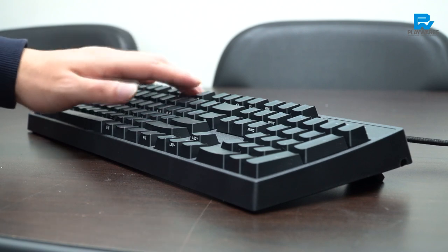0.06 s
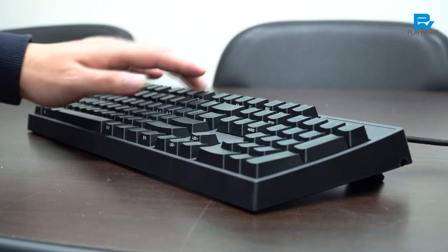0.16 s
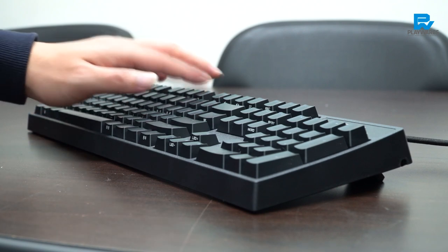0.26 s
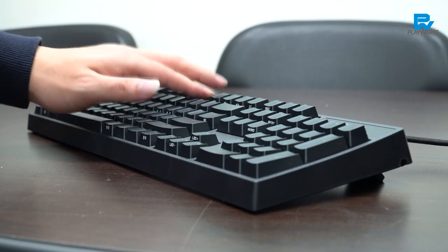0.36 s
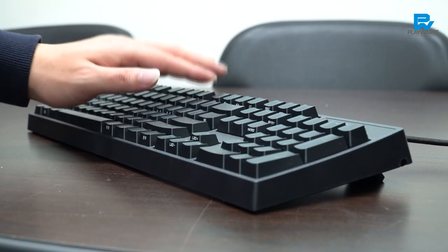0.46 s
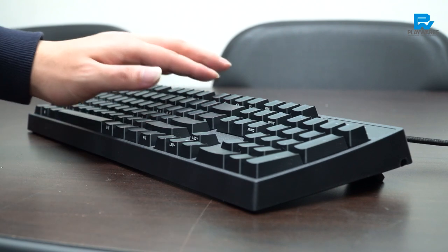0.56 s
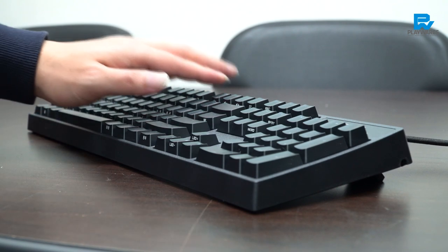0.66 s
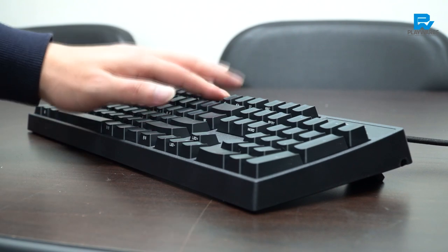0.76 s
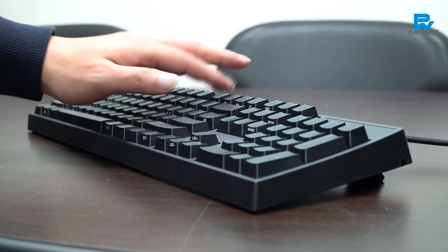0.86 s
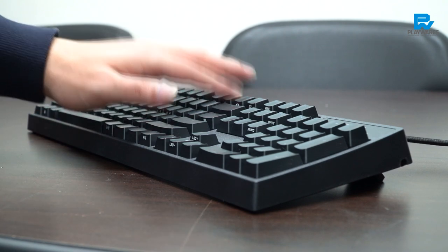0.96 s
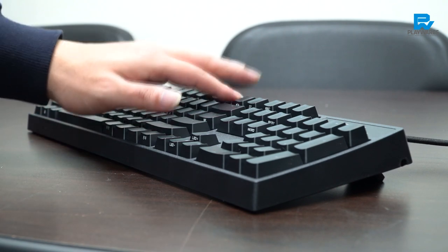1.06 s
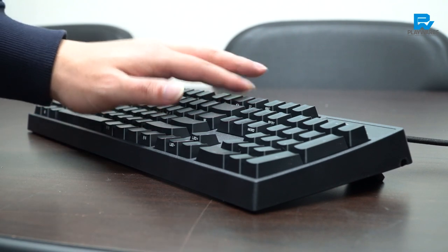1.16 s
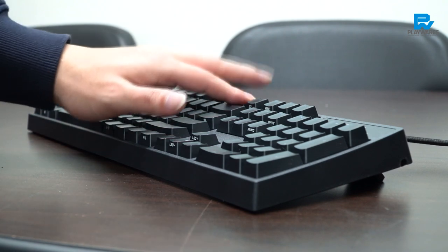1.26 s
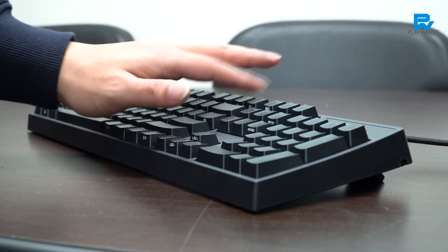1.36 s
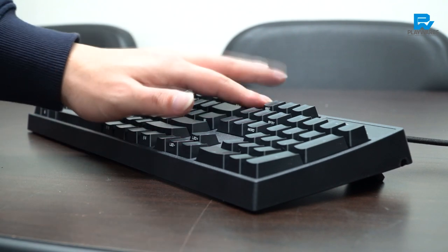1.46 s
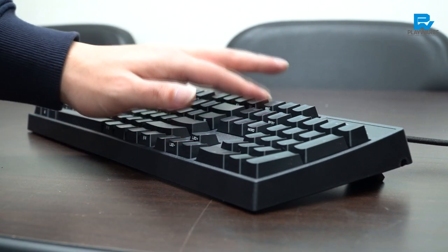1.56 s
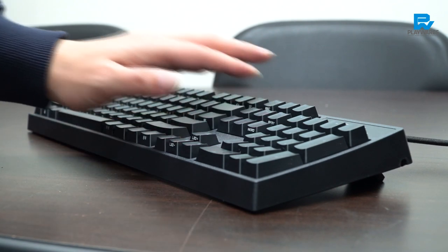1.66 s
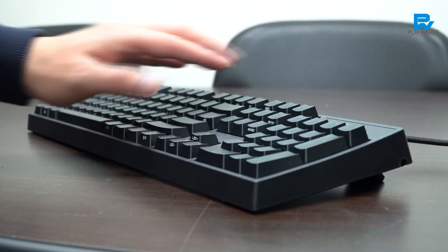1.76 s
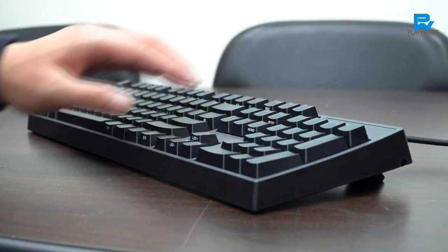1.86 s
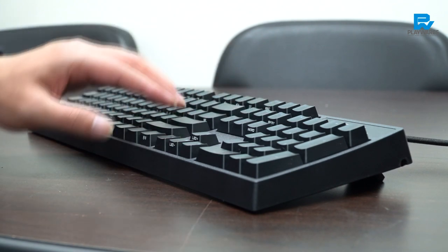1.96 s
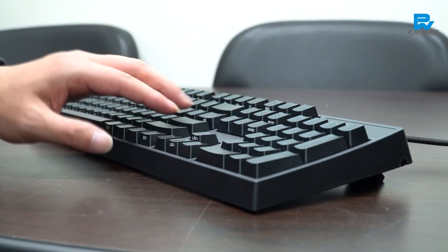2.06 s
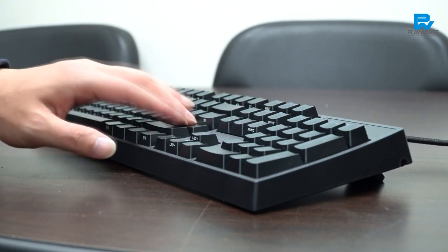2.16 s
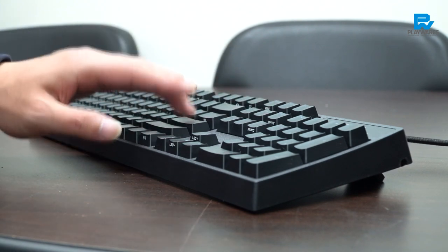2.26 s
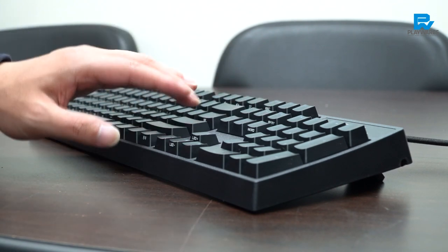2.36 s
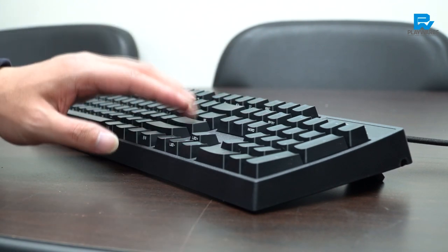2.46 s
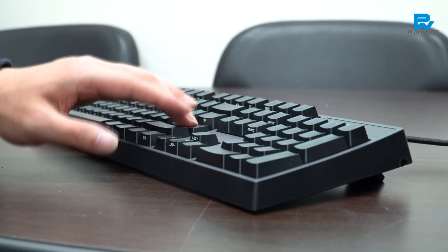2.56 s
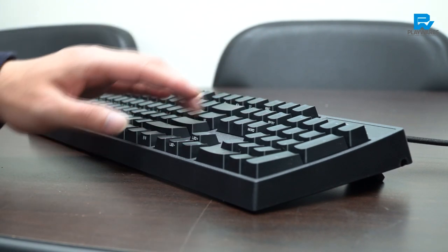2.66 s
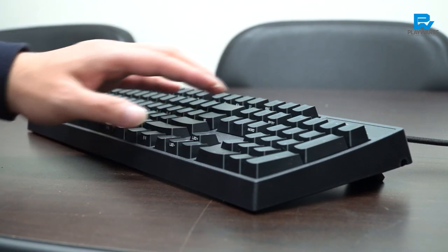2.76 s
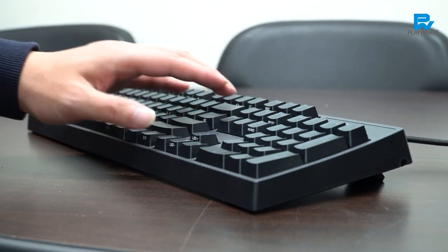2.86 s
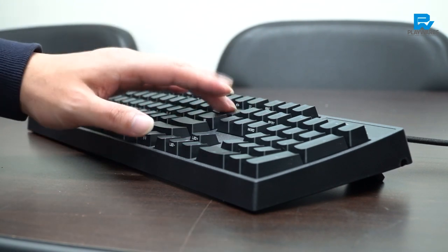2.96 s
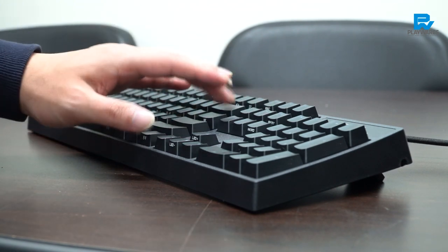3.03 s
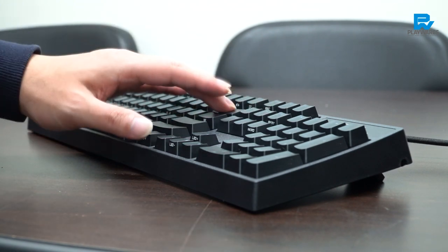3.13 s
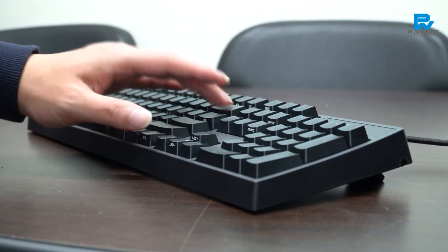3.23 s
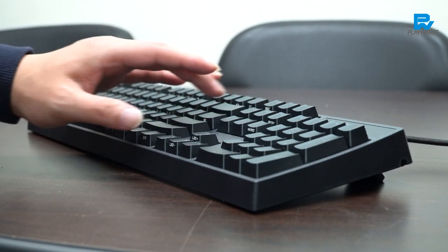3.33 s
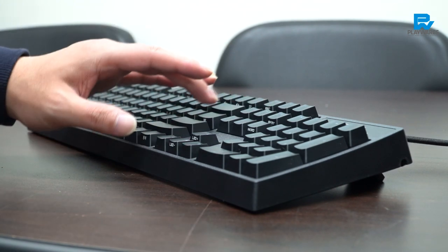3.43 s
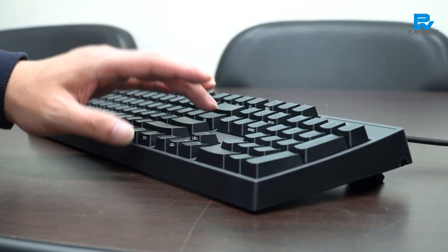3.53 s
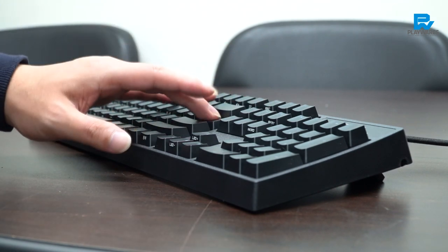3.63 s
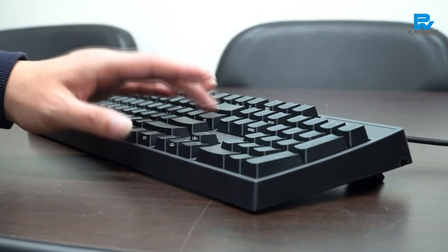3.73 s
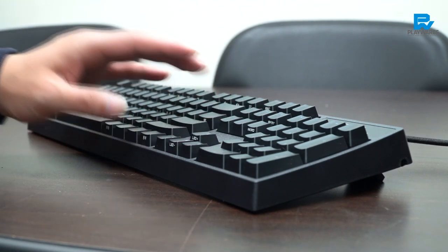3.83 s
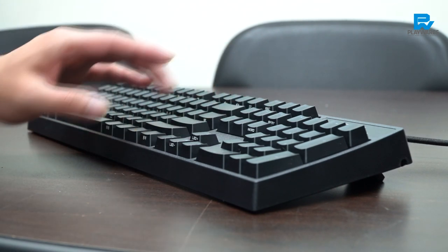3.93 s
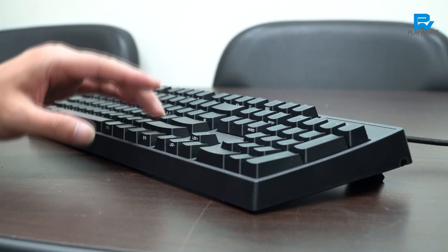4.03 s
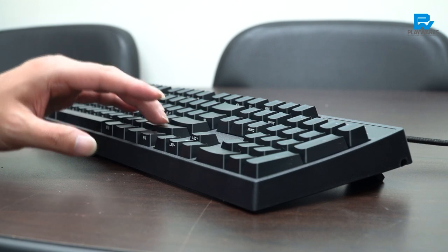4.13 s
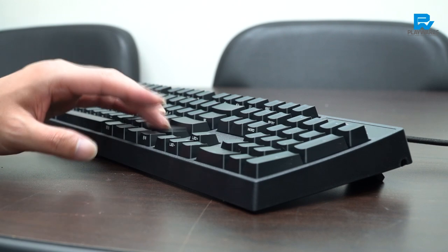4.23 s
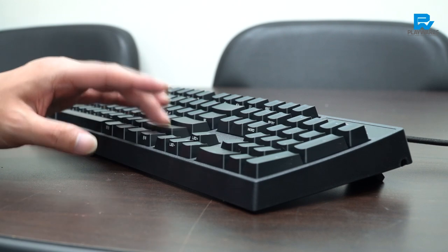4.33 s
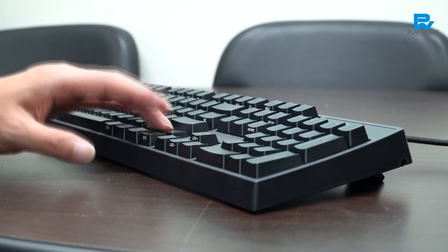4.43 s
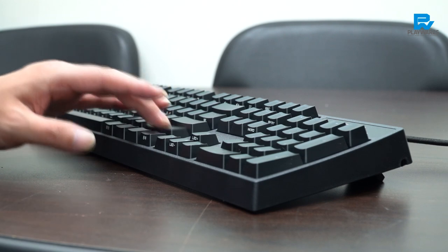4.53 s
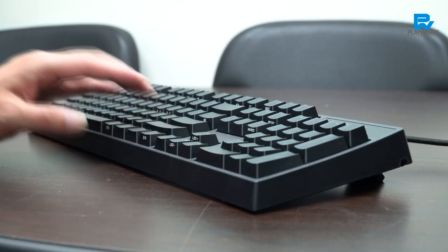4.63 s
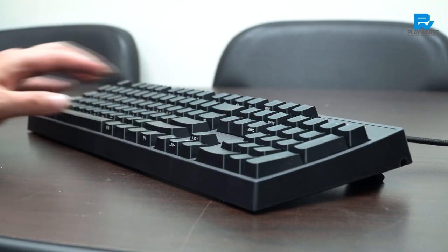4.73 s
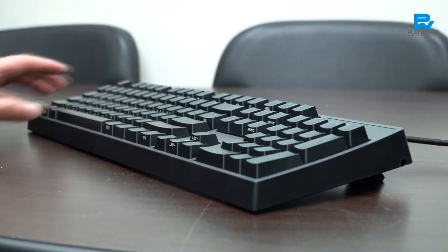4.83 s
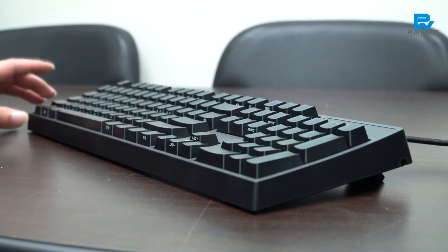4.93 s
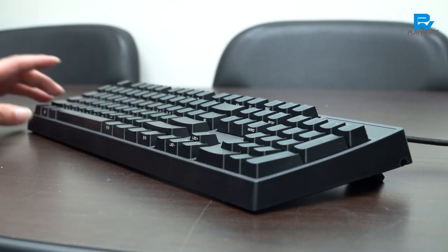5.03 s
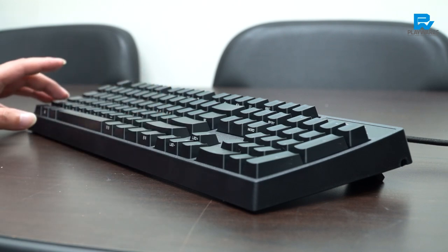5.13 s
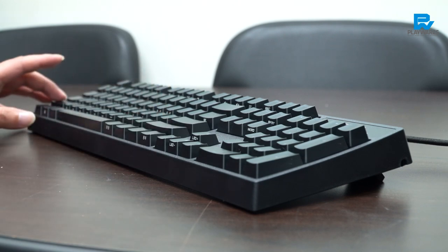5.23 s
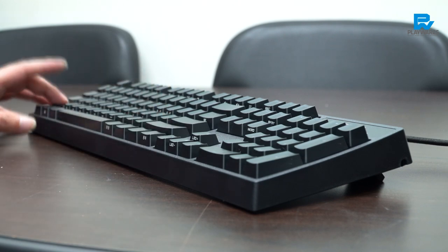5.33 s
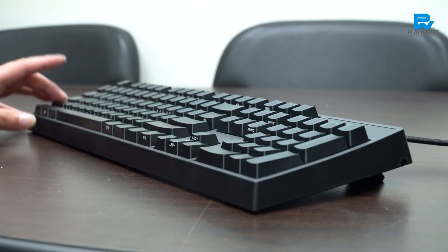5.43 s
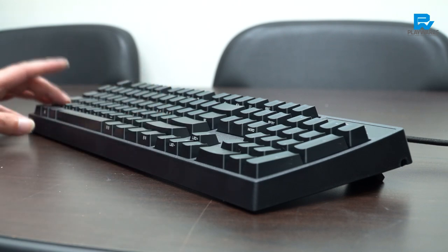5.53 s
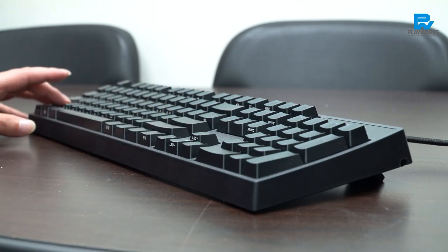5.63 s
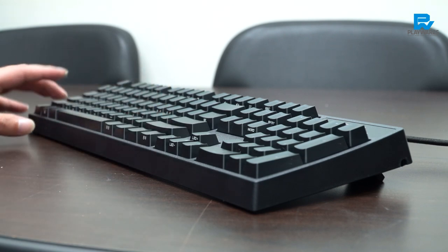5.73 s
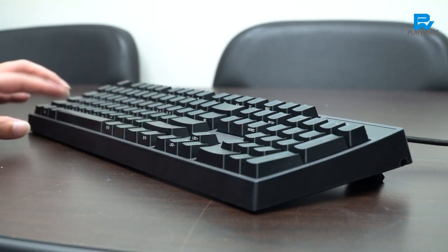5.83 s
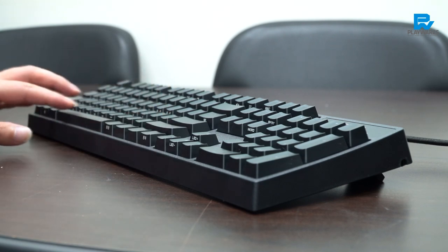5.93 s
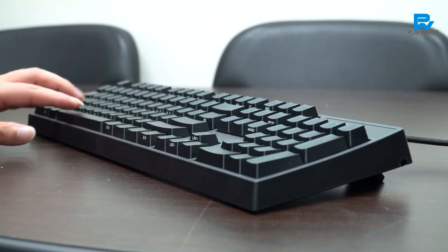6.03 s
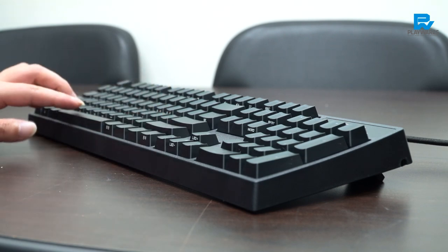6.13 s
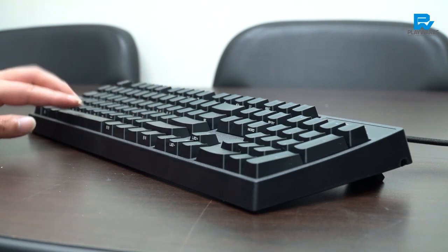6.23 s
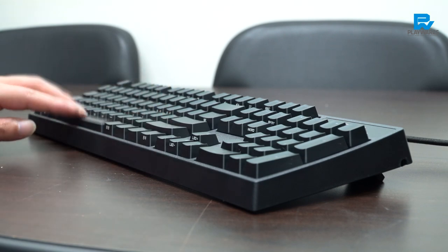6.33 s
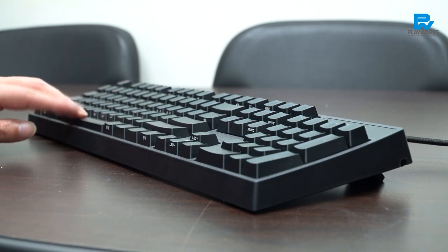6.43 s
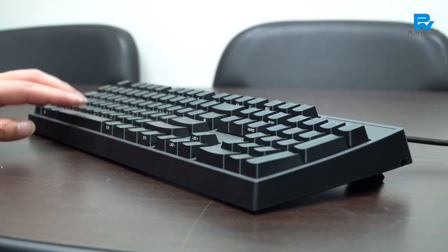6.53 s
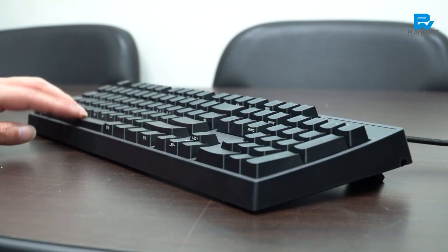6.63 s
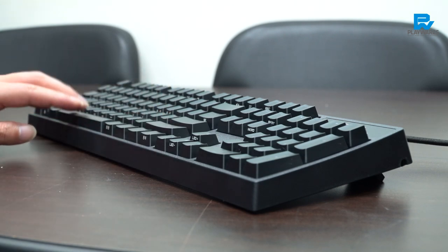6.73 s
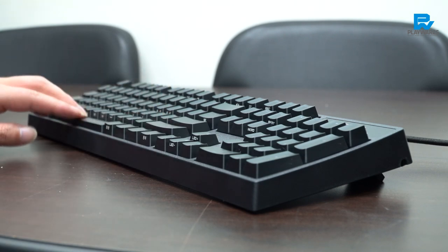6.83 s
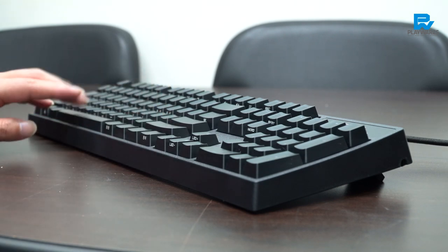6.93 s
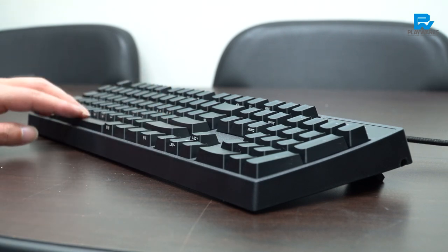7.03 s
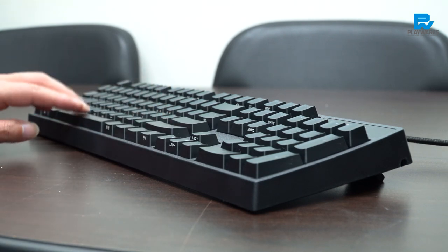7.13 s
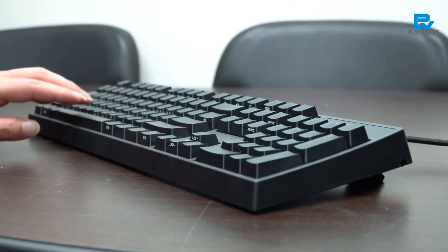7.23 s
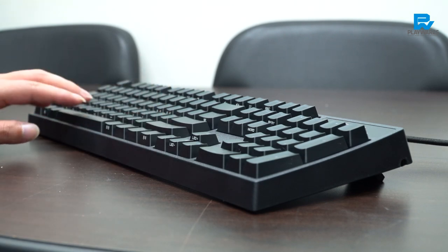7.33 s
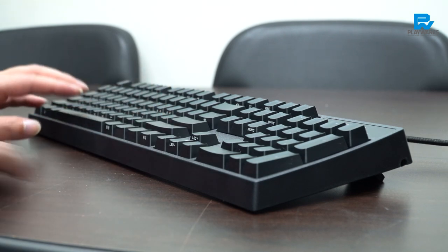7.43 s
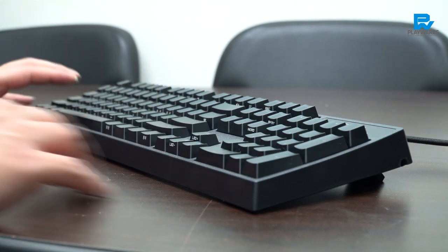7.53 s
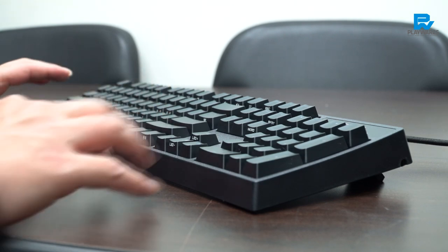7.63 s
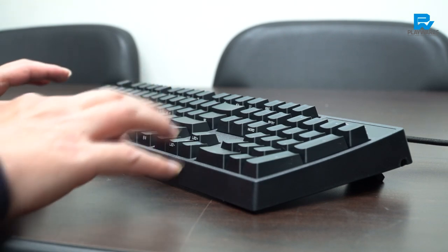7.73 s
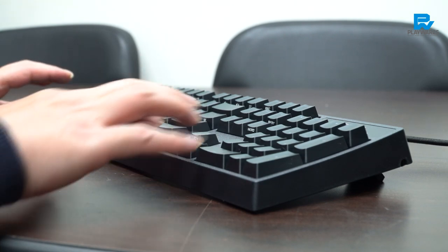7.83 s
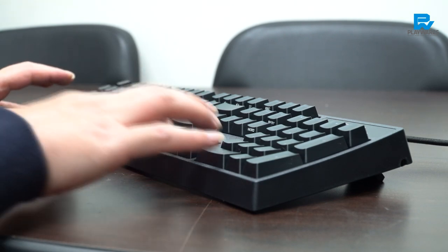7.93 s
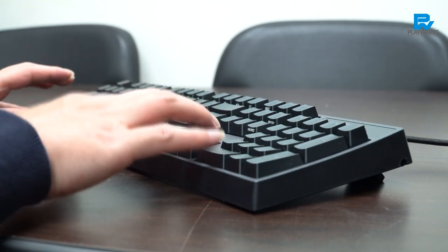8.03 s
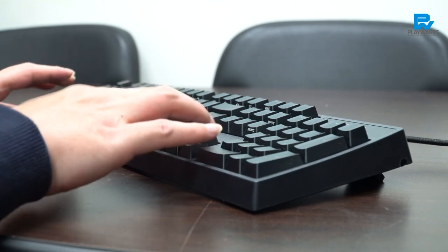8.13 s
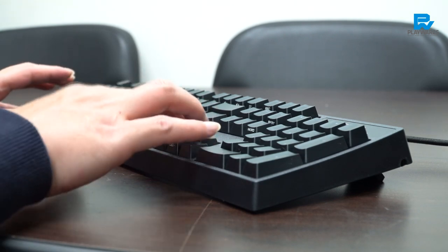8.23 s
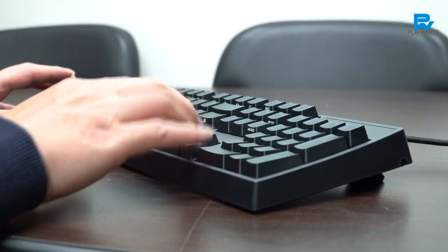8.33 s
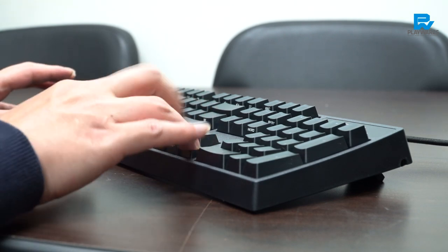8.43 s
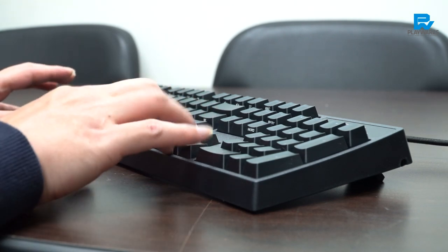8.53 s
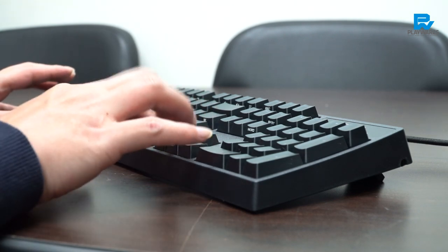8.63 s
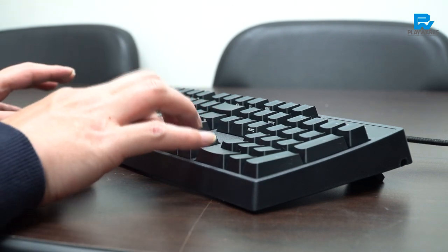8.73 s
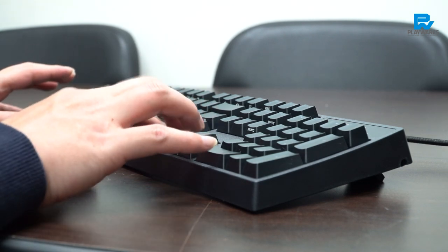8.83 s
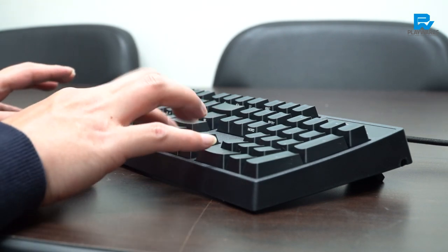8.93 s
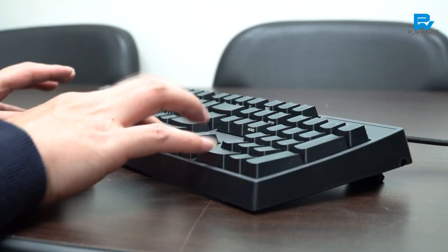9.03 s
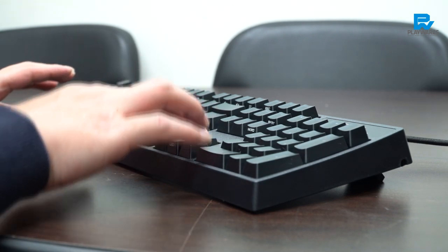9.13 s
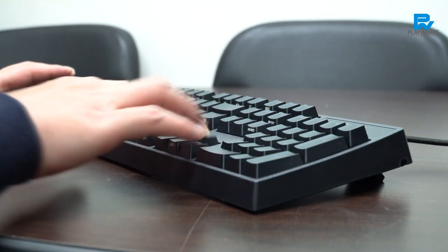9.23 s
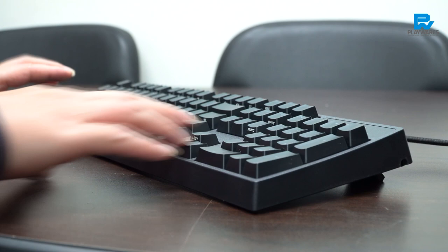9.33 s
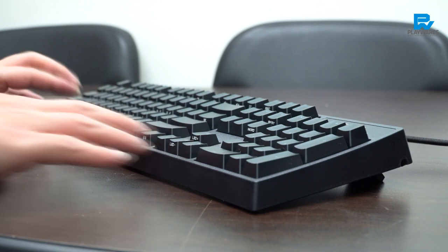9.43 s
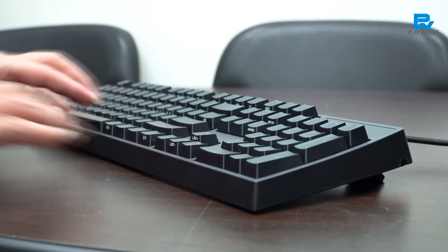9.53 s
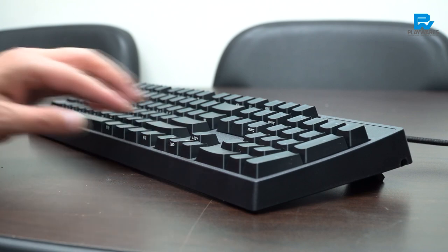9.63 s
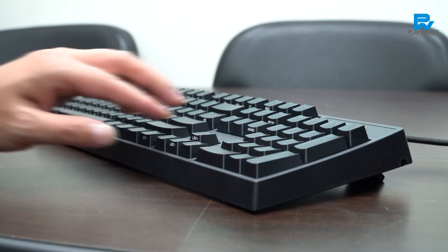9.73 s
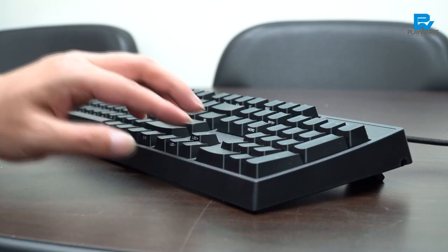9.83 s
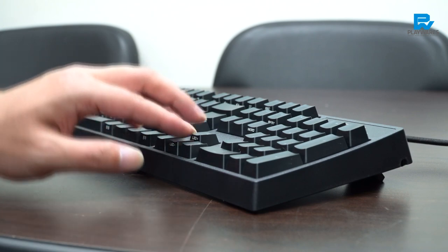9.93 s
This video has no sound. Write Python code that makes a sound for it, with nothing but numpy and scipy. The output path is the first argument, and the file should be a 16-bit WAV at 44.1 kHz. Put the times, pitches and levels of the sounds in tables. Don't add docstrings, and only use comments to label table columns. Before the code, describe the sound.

Single clicky mechanical keyboard strokes on a wooden desk, each snapping down and knocking back up, over faint ventilation in a small hard room.

```python
import sys
import numpy as np
from scipy import signal
from scipy.fft import rfft, irfft
from scipy.io import wavfile
from scipy.ndimage import uniform_filter1d

SR = 44100
rng = np.random.default_rng(int(sys.argv[2]) if len(sys.argv) > 2 else 0)


def decibels_to_gain(level_db):
    exponent = np.asarray(level_db, float) / 20
    return 10 ** exponent


def persist_wave(psi):
    counts = np.round(np.clip(psi, -1, 1) * 32767).astype(np.int16)
    wavfile.write(sys.argv[1], SR, np.atleast_2d(counts).T)


N = 440118

# start in seconds, level at the recorder in dB, cap pitch in Hz, nail tick
# in dB.
TAPS = [(0.343, -12, 2530, -24), (0.763, -7.5, 2460, -12), (1.0215, 1, 2350, -13), (1.2566, -7, 1760, -11),
        (1.4894, -13.5, 1570, -16.5), (2.2045, 5, 3540, 3.5), (2.5409, -4, 3280, -21),
        (2.5513, -10, 3100, -1.5), (2.96, -4.5, 1670, -6), (3.1507, -9, 1620, -4.5), (3.16, -12, 1960, -31),
        (3.6495, -11, 3600, -24), (4.291, -4, 3180, -39), (4.4799, -9, 3900, -29), (5.3682, -11, 1630, -29),
        (5.3799, -6, 2530, -28), (5.57, -14, 2160, -30), (6.3918, -9, 2120, -28), (6.854, -5, 1257, -3.5),
        (7.069, -16, 3020, -14.5), (8.0084, -13.5, 1400, -22), (8.016, -0.5, 2870, -27),
        (8.2077, -12, 2800, -29), (8.52, -2, 1800, -24.5), (8.844, -6.5, 3170, -22.5),
        (9.068, -13.5, 2440, -15.5)]
# start in seconds, level at the
# recorder in dB, # loudest ring in Hz.
CLICKS = [(0.0713, 0.5, 8290), (0.3592, -1.5, 7500), (0.7683, 1.5, 7600), (1.029, 1, 8080),
          (1.2654, 1.5, 8020), (1.4943, 3.5, 7800), (2.2106, -6, 7570), (2.553, -5.5, 7600),
          (2.9646, 0.5, 7600), (3.1594, -0.5, 7880), (3.6497, -6.5, 5900), (4.292, -3.5, 8700),
          (4.4767, -4, 8630), (5.382, 1.5, 8450), (5.587, 1, 7000), (6.393, 2.5, 8680), (6.633, -9.5, 8020),
          (6.6382, 3.5, 7860), (6.858, 4, 8770), (7.074, 4.5, 8350), (8.017, 4.5, 9060), (8.2102, 0, 11040),
          (8.397, -9.5, 8800), (8.403, 3, 11500), (8.5149, -2.5, 8000), (8.5238, 0.5, 7560),
          (8.844, 3, 7400), (8.855, -9, 9040), (9.068, 5, 9320), (9.7579, -10.5, 7600)]
# start in seconds, level at the recorder in dB, cap pitch in Hz,
# excess over the recorder limit in dB.
BOTTOMS = [(0.076, -4.5, 1280, 1.5), (0.3667, -3, 2910, 3), (0.771, -1.5, 1596, 1), (1.0354, -2, 1610, 0),
           (1.2718, -1.5, 1760, 1.5), (1.498, -3.5, 1610, 5), (2.2118, -1.5, 1400, 6.5),
           (2.562, -2.5, 1300, 3), (2.968, 0, 1610, 5.5), (3.1669, 0, 1590, 2.5), (3.6583, 2, 1500, -0.5),
           (4.304, -4.5, 1060, 0.5), (4.488, -0.5, 1020, 3), (5.3862, 2, 2180, 5), (5.591, 1.5, 1770, 4),
           (6.4018, 3, 1460, 2.5), (6.646, 1.5, 1770, 3.5), (6.862, 1.5, 1870, 6), (7.077, 0.5, 1610, 8.5),
           (8.025, -2, 1910, 4.5), (8.2185, -1, 1555, -5), (8.3943, -2.5, 1510, 4), (8.532, -1, 2475, 11.5),
           (8.5596, -2, 1130, 3.5), (9.0779, -6, 1280, 2), (9.7596, -11, 2250, 16)]
# start in seconds, level at the recorder in dB, cap pitch in Hz, stem tick in dB.
RETURNS = [(.217, -0.5, 1400, -10.5), (0.453, 1.5, 2630, -8), (0.8753, -1.5, 2210, -16.5),
           (1.1675, -3, 2260, -18), (1.3769, -18, 1430, -16), (1.6109, -1.5, 1505, -13),
           (2.2986, -4.5, 2320, -1), (2.6752, -11.5, 1350, -15), (3.0668, -4, 1820, -21),
           (3.0795, -7, 1670, -9), (3.2759, -1, 1690, -9.5), (3.7592, -5.5, 1460, -26),
           (4.388, -4, 2390, -12), (4.392, -4.5, 1020, -10.5), (4.607, -1.5, 2880, -13.5),
           (5.4879, 1, 2210, -8), (5.524, -10.5, 2170, -15), (5.756, 2, 2036, -1),
           (6.5356, -2.5, 1970, -11.5), (6.7525, -12, 2710, -31), (6.947, 0.5, 2140, -12),
           (7.185, -5, 1920, -19), (8.1675, -3.5, 1970, -12.5), (8.3507, -3, 1600, -22),
           (8.911, -4, 1400, -21.5), (9.135, -10, 3140, -35), (9.1982, -2.5, 1490, -13.5),
           (9.3149, -7, 1900, -15.5), (9.335, -9.5, 3030, -18)]
# start in seconds, level at the recorder in dB, cap pitch in Hz.
NUDGES = [(0.203, -19.5, 1600), (.863, -9.5, 2300), (1.138, -24, 1300), (1.153, -21, 1440),
          (3.632, -23, 1480), (3.6355, -21.5, 1140), (4.096, -36, 1240), (4.205, -22, 900),
          (4.2385, -31, 1040), (4.2451, -26, 875), (4.2536, -23, 1050), (4.269, -19, 2250),
          (5.254, -22, 2960), (5.318, -28, 1870), (5.349, -22.5, 1980), (5.7263, -15, 1290),
          (6.3788, -25, 1400), (7.13, -38, 1400), (8.829, -25.5, 1690), (8.897, -13.5, 1330),
          (9.043, -28, 1270), (9.449, -22, 1400)]


def at_hz(points, hz, axis=1):
    return np.interp(np.log(hz), np.log(np.array(points)[:, 0]), np.array(points)[:, axis])


def coloured(spectrum):
    hz = np.maximum(np.arange(N // 2 + 1) * SR / N, 1)
    x = irfft(rfft(rng.standard_normal(N)) * decibels_to_gain(at_hz(spectrum, hz)), N)
    return x / x.std()


def ring(clicks, hz, t60):
    r, w = decibels_to_gain(-60 / (t60 * SR)), 2 * np.pi * hz / SR
    return signal.lfilter([0, np.sin(w)], [1, -2 * r * np.cos(w), r * r], clicks + 1e-18)


def strike(times, level_db, modes, spread_db, near_hz=None, db_per_octave=0, swell_t60=None):
    at, out = (times * SR).astype(int), np.zeros(N)
    luck = rng.standard_normal((len(at), len(modes), 2))
    for k, (hz, db, t60) in enumerate(modes):
        far_db = 0 if near_hz is None else db_per_octave * abs(np.log2(hz / near_hz))
        height = decibels_to_gain(level_db + db - far_db + spread_db * luck[:, k, 0])
        clicks = np.zeros(N)
        np.add.at(clicks, at, height * np.sign(luck[:, k, 1]))
        out += ring(clicks, hz, t60)
        if swell_t60:
            out -= ring(clicks, hz, swell_t60)
    return out


def own_rings(times, level_db, hz, t60, rise_s, crack_db, crack_s, width, tint):
    t, out = np.arange(1300) / SR, np.zeros((3, N + 1300))
    paths = 1 + np.argsort(np.argsort(times)) % 2
    noises = rng.standard_normal((len(times), len(t)))
    kick = t == 0
    for s, db, f, path, noise in zip(times, level_db, hz, paths, noises):
        colour = signal.iirpeak(f, 1 / width, fs=SR)
        noise, pulse = signal.lfilter(*colour, [noise, kick])
        pulse += tint * signal.lfilter(*signal.iirpeak(f, 4 / width, fs=SR), kick)
        crack = decibels_to_gain(crack_db) * noise / noise.std() * np.exp(-t / crack_s)
        tone = np.sin(2 * np.pi * f * t) * decibels_to_gain(-60 * t / t60)
        near = (tone + crack) * (1 - np.exp(-t / rise_s))
        near *= (1 + decibels_to_gain(crack_db)) / abs(near).max()
        pulse *= np.sign(noise[-1]) * np.sqrt(np.mean(crack ** 2) / np.mean(pulse ** 2))
        start = int(s * SR)
        out[[0, path], start:start + len(t)] += decibels_to_gain(db) * np.array([near, pulse])
    return out[:, :N]


def ducks():
    bottom, stop, click = np.transpose(BOTTOMS), np.transpose(RETURNS), np.transpose(CLICKS)
    click_limit_db = 3
    return np.hstack([bottom[[0, 3]], stop[:2], [click[0], click[1] - click_limit_db]])


def duck_db():
    s, duck = ducks()
    drop, total = np.zeros(N), 0
    drop[(s * SR).astype(int)] = np.maximum(duck, 0)
    for depth, db_per_s in (1, 165), (1.43, 700):
        climb = db_per_s * np.arange(N) / SR
        total = np.maximum(total, np.maximum.accumulate(depth * drop + climb) - climb)
    return total


def true_db(s, heard_db):
    duck = duck_db()
    return heard_db + np.maximum(duck[(s * SR).astype(int)], duck[((s + .002) * SR).astype(int)])


def ventilation():
    # time in seconds, rumble in dB, hiss in dB.
    drift = [
        (0, -52, -49),
        (1.999, -55.5, -56.5),
        (4, -48, -55),
        (5.002, -50.5, -54),
        (6.2, -44, -51.5),
        (7.8, -45, -52.5),
        (9.98, -45.5, -48.5),
    ]
    # frequency in Hz, density in dB per Hz.
    rumble = [(100, -34.5), (146, -8), (187, 2.5), (286, -1), (500, -17.5), (3300, -100)]
    hiss = [(290, -43.5), (500, 0.5), (761, -8.5), (818, -3), (933, -7.5), (1620, -11), (10600, -22),
            (16000, -23.5)]
    building = [(9, -39), (18, 11), (35, -5), (55, 0.5), (80, -7.5), (125, -5.5), (170, -23), (400, -102)]
    s, rumble_db, hiss_db = np.transpose(drift)
    t = np.arange(N) / SR
    out = decibels_to_gain(np.interp(t, s, rumble_db)) * coloured(rumble)
    out += decibels_to_gain(np.interp(t, s, hiss_db)) * coloured(hiss)
    return out + decibels_to_gain(-47) * coloured(building)


def touches():
    # start in seconds, level in dB.
    pads = [(0.063, -15.5), (0.342, -13), (0.757, -26), (1.487, -17.5), (2.958, -14.5), (4.465, -20),
            (5.358, -23.5), (6.38, -10.5), (6.631, -4), (6.846, -13), (7.066, -5.5), (8.0, -21),
            (8.514, -2.5), (8.891, -22), (9.046, -40)]
    s, db = np.transpose(pads)
    return own_rings(s, db - 36.5, np.full(len(s), 1800.), t60=.01, rise_s=0.0044, crack_db=32.5,
                     crack_s=0.011, width=0.87, tint=0.24)


def room(x):
    # frequency in Hz, t60 in seconds, tail level in dB.
    decay = [(206.3, 0.16, -28), (500, 0.37, -25), (1400, 0.37, -28.5), (3560, 0.43, -31.5),
             (7400, 0.36, -29.5), (13400, 0.24, -30.5)]
    # frequency in Hz, sharpness (Q), share taken out.
    dips = [(1900, 4.0, .2), (7600, 5, 0.16)]
    t, tail = np.arange(SR // 2 + SR // 4) / SR, 0
    edges = 90 * 2 ** np.arange(0, 8, .5)
    for low, high, white in zip(edges, edges[1:], rng.standard_normal((len(edges), len(t)))):
        band = signal.sosfilt(signal.butter(2, [low, high], "band", fs=SR, output="sos"), white)
        hz = np.sqrt(low * high)
        tail = tail + band * decibels_to_gain(at_hz(decay, hz, axis=2) - 60 * t / at_hz(decay, hz))
    for hz, sharp, share in dips:
        tail = tail - share * signal.lfilter(*signal.iirpeak(hz, sharp, fs=SR), tail)
    far_wall = 0.087 * np.exp(-((t - 0.048) / 0.00094) ** 2)
    tail *= np.clip((t - .003) / 0.0062, 0, 1) * (1 + far_wall)
    return signal.fftconvolve(x, tail)[:N]


def glows():
    # start in seconds, level at the recorder in dB, frequency in Hz.
    parts = [(.07, -19.5, 6500), (.075, -13.5, 2280), (.367, -23, 950), (.453, -23.5, 950),
             (.453, -13.5, 2650), (.77, -11, 3500), (.875, -15, 1450), (1.035, -22.5, 1000),
             (1.035, -15.5, 1980), (1.495, -10, 2500), (1.495, -8, 12000), (1.611, -17.5, 3120),
             (2.555, -8, 13000), (2.562, -17.5, 1500), (2.676, -20, 2720), (2.968, -21.5, 1020),
             (2.965, -7, 5000), (2.965, -9.5, 13000), (3.07, -13, 3100), (3.165, -10, 3400),
             (3.276, -14.5, 4800), (3.65, -9, 9500), (3.65, -6.5, 7200), (3.658, -13, 1400),
             (3.76, -15, 2750), (4.292, -7, 5900), (4.292, -15, 8740), (4.39, -9.5, 5500), (4.48, -8, 5830),
             (4.488, -19.5, 930), (4.607, -19.5, 880), (5.386, -4.5, 2150), (5.386, -18, 1140),
             (5.586, -4, 13000), (5.591, -11, 1900), (5.756, -12, 1900), (6.536, -11.5, 1790),
             (6.64, -11, 12000), (6.858, -11, 8900), (6.862, -9, 1900), (6.947, -13, 4020),
             (7.075, -8, 5200), (8.017, -6, 10100), (8.21, -5, 10700), (8.218, -12, 2000),
             (8.403, -4, 8500), (8.532, -14, 3320), (8.845, -2.5, 9100), (8.911, -13, 1500),
             (9.07, -5, 9300), (9.078, -14, 2130), (9.197, -17, 1900)]
    s, db, hz = np.transpose(parts)
    cycles = 19
    t, out = np.arange(2000) / SR, np.zeros(N + 2000)
    for start, level_db, f in zip((s * SR).astype(int), true_db(s, db), hz):
        out[start:start + len(t)] += decibels_to_gain(level_db - 60 * t * f / cycles) * np.sin(2 * np.pi * f * t)
    return out[:N]


def snap_rows():
    # start in seconds, level at the recorder in dB, loudest ring in Hz.
    switch_ticks = [(3.648, -2, 12950), (0.3659, -5, 8100), (.4424, -10.5, 8560), (.862, -11, 9040),
                    (1.141, -17, 7920), (1.271, -4.5, 7150), (1.3577, -14.5, 9270), (1.591, -12.5, 8370),
                    (2.562, -6, 5280), (2.653, -20.5, 8480), (3.0662, -14, 7600), (3.246, -20.5, 7800),
                    (3.643, -17.5, 8600), (3.741, -16, 8400), (4.4794, -1, 13200), (4.2918, -1.5, 13520),
                    (4.577, -22, 13000), (5.732, -17.5, 5400), (6.388, -16, 8500), (6.5122, -14.5, 8340),
                    (6.9314, -6.5, 5430), (7.0785, -5, 8340), (4.372, -19, 12700), (8.023, -4.5, 6020),
                    (8.151, -14, 7060), (8.332, -14.5, 8500), (8.5308, -2.5, 7600), (9.058, -21, 13500),
                    (9.1433, -2, 9960), (9.294, -12.5, 8230),
                    (0.2023, -18, 8075), (0.342, -10.5, 7970), (2.286, -14.5, 11200), (3.759, -16, 7900),
             (4.285, -19.5, 6230), (7.155, -12, 5200), (4.472, -17.5, 8100), (5.3676, -14.5, 5300),
             (5.468, -16.5, 7000), (6.402, -7, 5640), (6.7168, -16, 8060), (8.007, -26, 12200),
             (8.202, -22.5, 10530), (8.218, -13, 10400), (8.35, -12.5, 8030), (8.561, -14, 8560),
             (8.8308, -24, 13040), (8.911, -12.5, 13600), (9.078, -7.5, 9260), (4.3958, -15, 8100),
             (4.399, -13.5, 12650), (4.405, -24, 13000), (4.410, -24, 8000), (4.274, -29, 7960),
             (7.152, -18, 13200), (5.387, -3, 5560)]
    tap, stop, nudge = np.transpose(TAPS), np.transpose(RETURNS), np.transpose(NUDGES)
    nail_hz, stem_hz = 7600, 5640
    nails = [tap[0] + 0.0008, tap[3], nail_hz + 0 * tap[0]]
    stems = [stop[0] - .0008, stop[3], stem_hz + 0 * stop[0]]
    nudged = [nudge[0], nudge[1] - 11, stem_hz + 0 * nudge[0]]
    return np.hstack([np.transpose(CLICKS), np.transpose(switch_ticks), nails, stems, nudged])


def snaps():
    # frequency in Hz, level in dB, t60 in seconds.
    housing = [(3230, -13, 0.006), (5850, -17.5, 0.0021), (8145, -4, 0.005), (8620, -12.5, 0.008),
               (10260, -16, 0.003), (13000, -12, .005), (14900, -30, .004)]
    s, db, hz = snap_rows()
    db = true_db(s, db)
    x = own_rings(s, db - 10.5, hz, t60=0.014, rise_s=0.00025, crack_db=3.0, crack_s=0.0016, width=0.86, tint=3.5)
    x[0] += strike(s, db - 3.0, housing, spread_db=-2.5)
    return signal.sosfilt(signal.butter(2, [2800, 15000], "band", fs=SR, output="sos"), x)


def knock_rows():
    # start in seconds, level at the recorder in dB, pitch in Hz.
    rattles = [(0.081, -5.5, 1270), (.089, -20.5, 1280), (0.222, -4.5, 1400), (.230, -22, 1310),
               (2.973, -6.5, 1240), (3.172, -6, 1516), (4.397, -18, 1810), (1.2661, -10, 2900),
               (1.400, -21, 1336), (1.510, -9, 1400), (1.527, -17, 1736), (3.040, -15.5, 1130),
               (3.252, -15, 1580), (3.694, -14, 1280), (4.2996, -7.5, 1490), (4.4838, -2.5, 1690),
               (4.468, -25, 1090), (5.262, -24, 1080), (5.416, -9.5, 1190), (6.385, -15, 1314),
               (6.512, -14, 3015), (6.546, -13, 2000), (6.67, -5, 1220), (6.762, -12.5, 2550),
               (7.131, -10, 1510), (7.189, -8, 1020), (8.2237, -6, 1630), (8.291, -18, 1680),
               (8.411, -17, 1670), (8.546, -7.5, 1220), (8.562, -22, 1200), (8.573, -9, 1940),
               (8.594, -18, 1110), (8.818, -28, 1615), (8.854, -19, 1540), (9.252, -29, 1700),
               (9.7612, -12, 1490), (9.77, -6, 1490), (9.781, -7.5, 2100), (9.788, -10, 1180),
               (9.794, -14, 2120), (9.811, -21, 1230), (9.835, -8, 1293), (9.844, -13, 1210),
               (9.8497, -6.5, 1430), (9.860, -2.5, 1240), (9.877, -9, 1540), (2.236, -6.5, 890),
               (2.245, -2, 2650), (2.256, -8, 1180), (5.408, -12, 2100), (5.612, -13, 1700),
               (5.629, -22, 1790), (6.95, -8, 880), (1.636, -20, 1700)]
    # time in seconds, thump relative to the knock in dB.
    weight = [(0, -31), (.8, -30), (1.6, -32), (2.6, -35), (3.4, -28.5), (4.1, -28), (4.7, -25.5),
              (5.5, -30.5), (6.2, -21), (7.3, -21.5), (8, -27.5), (8.6, -26.5), (9.2, -25.5), (9.7, -26)]
    rows = [np.transpose(table)[:3] for table in (TAPS, NUDGES + rattles, BOTTOMS, RETURNS)]
    for (s, db, hz), bounce_db in zip(rows[2:], (-8, -9)):
        rows = rows + [[s + .004, db + bounce_db, hz * 0.782]]
    s, db, hz = np.hstack(rows + [clatter_rows()])
    return s, db, hz, np.interp(s, *np.transpose(weight))


def knocks():
    # frequency
    # in Hz, level in dB, t60 in seconds.
    case = [(800, -20, .04), (1040, -12, .03), (1265, -12, .045), (1430, -11, .03), (1640, -11, .025),
            (1910, -11, .025), (2290, -11, .02), (2900, -13, .015)]
    springs = [(1265, 0, .2), (1400, -8, .15)]
    hums = [(1222, 0, 1.1), (1262, 0, 1.2)]
    desk_top = [(126.7, -11.5, 0.13), (189.6, -16.5, 0.14), (265, 0, 0.035), (361.5, -13, 0.084),
                (443, -2, 0.036), (555, -6, 0.045), (670, -13, 0.04)]
    # start in seconds, level in dB.
    pings = [(.081, -27), (0.449, -27), (2.56, -26), (2.675, -33), (2.965, -26), (3.169, -20),
             (3.276, -23.5), (3.656, -16.5), (3.763, -32), (9.08, -27), (9.316, -28.5)]
    # start in seconds, level in dB, hum in Hz.
    hum_starts = [
        (.45, -46, 1262),
        (1.61, -49.5, 1262),
        (2.561, -48, 1262),
        (2.97, -46, 1262),
        (3.658, -36.5, 1222),
        (9.317, -44, 1262),
    ]
    s, db, hz, thump_db = knock_rows()
    db = true_db(s, db)
    x = own_rings(s, db - 7.0, hz, t60=0.021, rise_s=0.00014, crack_db=-3.0, crack_s=0.0045, width=0.77, tint=0.8)
    x[0] += strike(s, db - 6.0, case, spread_db=5.0, near_hz=hz, db_per_octave=7.0)
    x[0] += strike(*np.transpose(pings), springs, spread_db=-1, swell_t60=0.0075)
    hum_s, hum_db, hum_hz = np.transpose(hum_starts)
    x[0] += strike(hum_s, hum_db, hums, spread_db=0, near_hz=hum_hz, db_per_octave=500, swell_t60=.01)
    x = signal.sosfilt(signal.butter(3, [750, 5000], "band", fs=SR, output="sos"), x)
    desk = strike(s, db + thump_db + 3, desk_top, spread_db=2.5, swell_t60=.02)
    return x + desk * np.array([[decibels_to_gain(-1.0)], [decibels_to_gain(1.5)], [0]])


def booms(rows, peak_s, flat=0, glide_s=0.0143):
    t, out = np.arange(SR // 4) / SR, np.zeros(N + SR)
    swell = (t / peak_s * np.exp(1 - t / peak_s)) ** 2
    warped = t - flat * glide_s * (1 - np.exp(-t / glide_s))
    for s, db, hz in rows:
        start = int(s * SR)
        out[start:start + len(t)] += decibels_to_gain(db) * swell * np.sin(2 * np.pi * hz * warped)
    return out[:N]


def rocks():
    # start in seconds, level in dB, frequency in Hz.
    board = [(0.455, -35, 265), (3.07, -40, 134), (6.405, -32, 135), (6.415, -22.5, 358), (6.54, -30, 136),
             (6.629, -34, 191), (6.652, -21, 358), (6.875, -20, 363), (6.947, -30.5, 131),
             (7.092, -19, 357.4), (7.09, -31, 130), (7.19, -34, 127), (8.533, -27, 175), (9.756, -26, 302),
             (9.795, -19, 717)]
    return booms(board, peak_s=0.027, flat=0.265)


def clatter_rows(count=12):
    # start in seconds, length in seconds, level at the recorder in dB, first and last pitch in Hz.
    runs = [
        (1.366, 0.021, -15.5, 2790, 1520),
        (8.544, .06, -15.5, 1310, 2680),
        (9.759, 0.036, -13, 2650, 1900),
        (9.797, 0.08, -19, 1490, 1190),
    ]
    rows = []
    for s, length, db, first_hz, last_hz in runs:
        share = (np.arange(count) + rng.random(count)) / count
        loud, high = rng.standard_normal((2, count))
        hz = first_hz * (last_hz / first_hz) ** share * 2 ** (.3 * high)
        rows.append([s + length * share, db + 2 * loud, hz])
    return np.hstack(rows)


def thuds():
    # start in seconds, level in dB, frequency in Hz.
    palms = [(4.29, -33, 550), (4.385, -36, 551), (4.48, -27.5, 554), (4.6, -34.5, 542), (5.58, -31, 500),
             (5.75, -36, 478), (6.39, -27, 419), (6.68, -36, 605), (6.86, -25, 432), (7.1, -28.5, 610),
             (9.758, -27, 455), (9.765, -32, 500), (9.84, -27, 812), (9.86, -28, 599)]
    creaks = [(6.6, -44, 262), (6.02, -48, 490), (6.06, -44, 690), (6.07, -46, 450), (6.07, -39.5, 109),
              (6.21, -43.5, 300), (5.7, -39, 276), (6.19, -48, 550), (7.88, -58, 1100), (5.235, -50, 1085)]
    return booms(creaks + palms, peak_s=.026)


def slides():
    # loudest moment in seconds, level in dB, swell in dB per second.
    strokes = [
        (5.08, -50.5, 297),
        (6.02, -48, 25),
        (6.32, -55, 63),
        (7.55, -40, 19),
    ]
    # frequency in Hz, density in dB per Hz.
    cloth = [(290, -42), (620, -7.5), (950, -3), (2000, -9), (4600, -10.5), (6800, -15.5), (8500, -12),
             (15500, -39)]
    t = np.arange(N) / SR
    stop_db_per_s = 137
    levels = [db - np.where(t < s, swell * (s - t), stop_db_per_s * (t - s)) for s, db, swell in strokes]
    flutter_db = 0.78 * np.sin(2 * np.pi * 7.0 * t)
    return decibels_to_gain(np.max(levels, axis=0) + flutter_db) * coloured(cloth)


def scene():
    out = ventilation() + slides() + rocks() + thuds()
    for near, sent, other in snaps(), knocks() + touches():
        out = out + near + room(decibels_to_gain(-12.5) * near + decibels_to_gain(-3.5) * sent) + room(decibels_to_gain(-5.0) * other)
    return (out + room(glows()))[None]


def band_limit(x):
    return signal.sosfilt(signal.butter(12, 16130, fs=SR, output="sos"), x)


def record(dry):
    gain = decibels_to_gain(-uniform_filter1d(duck_db(), size=30))
    mix = np.clip(dry * gain, -1, 1)
    return band_limit(mix)


dry = scene()
out = record(dry)
persist_wave(out)
```